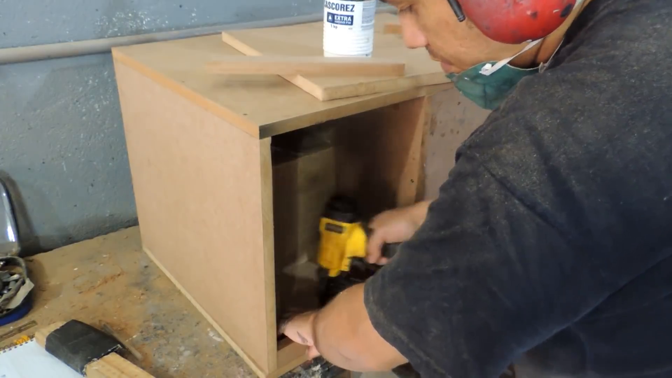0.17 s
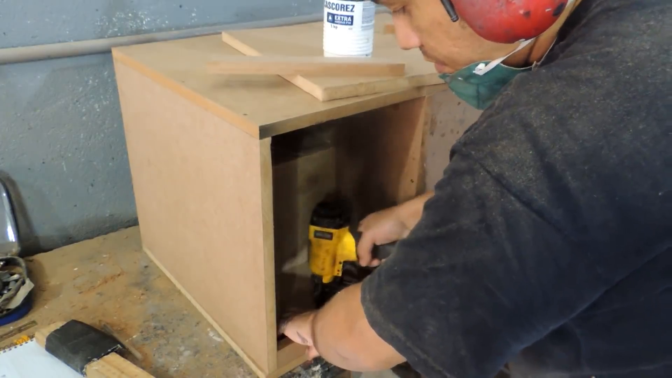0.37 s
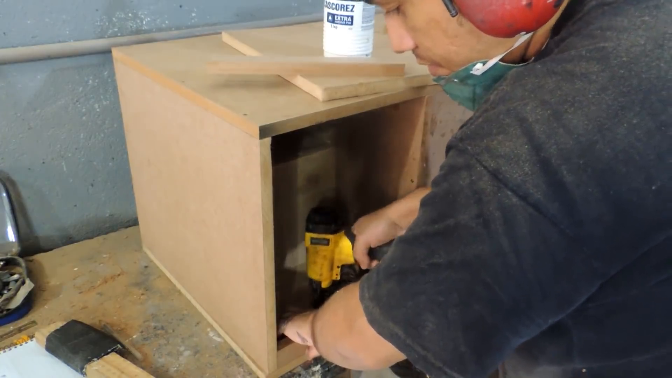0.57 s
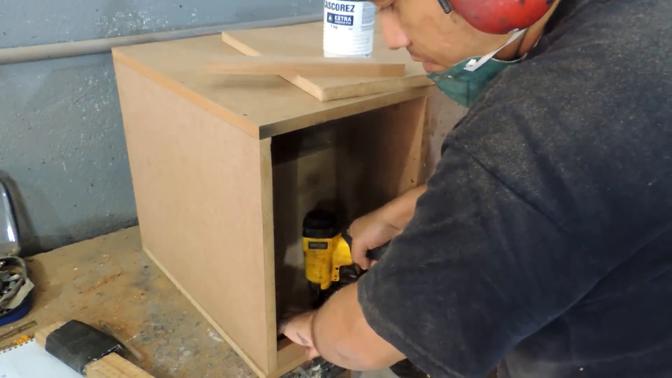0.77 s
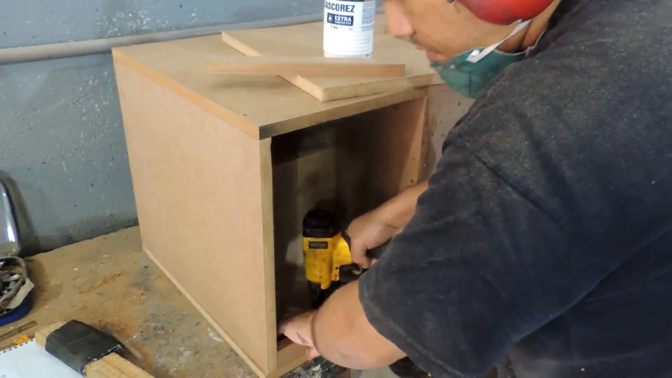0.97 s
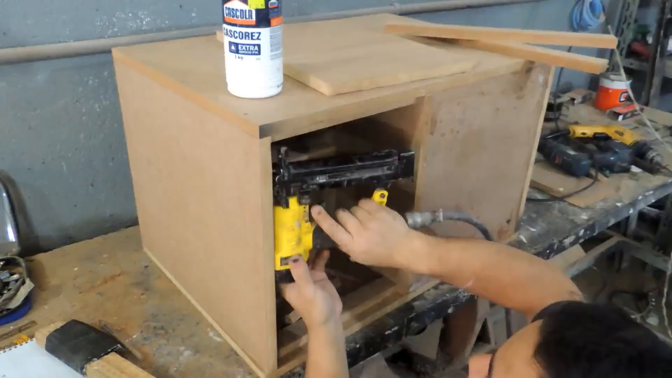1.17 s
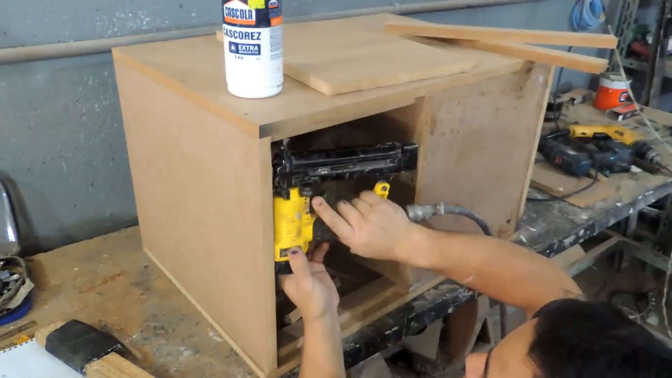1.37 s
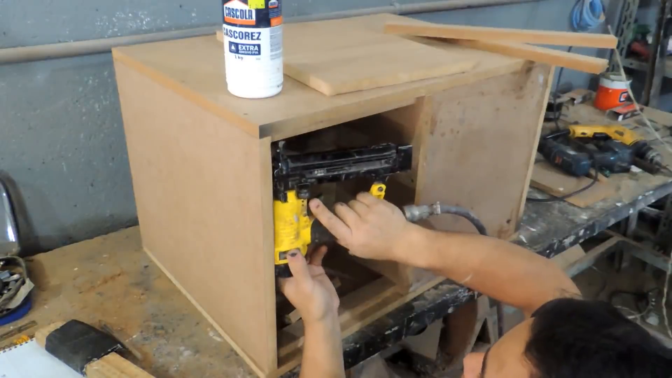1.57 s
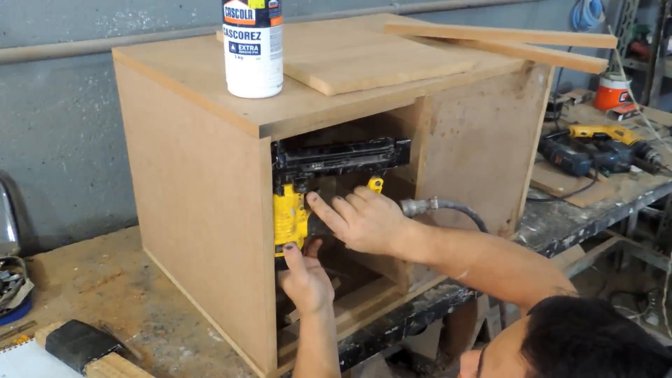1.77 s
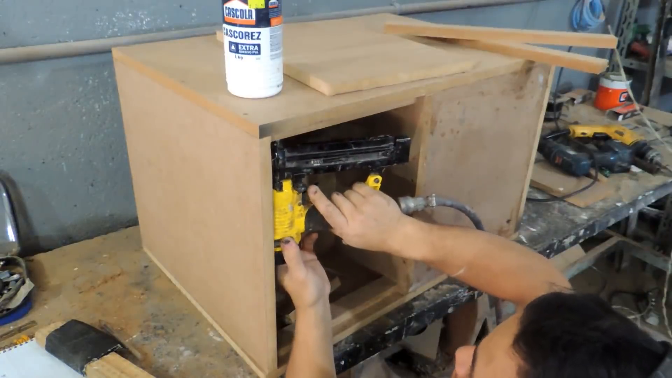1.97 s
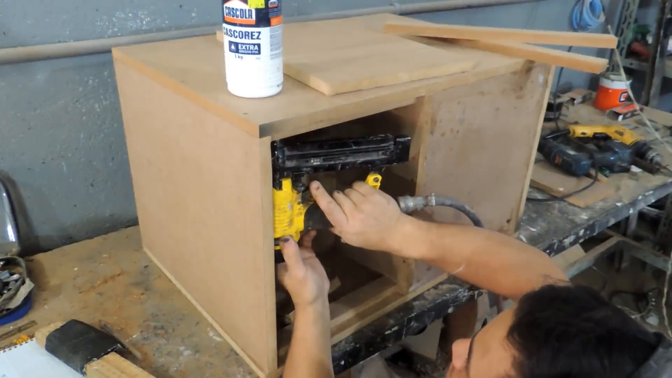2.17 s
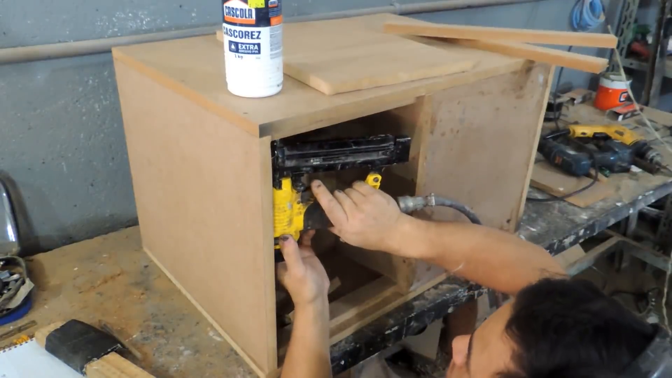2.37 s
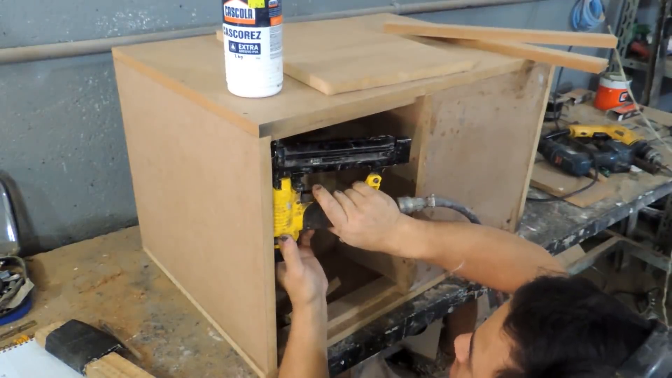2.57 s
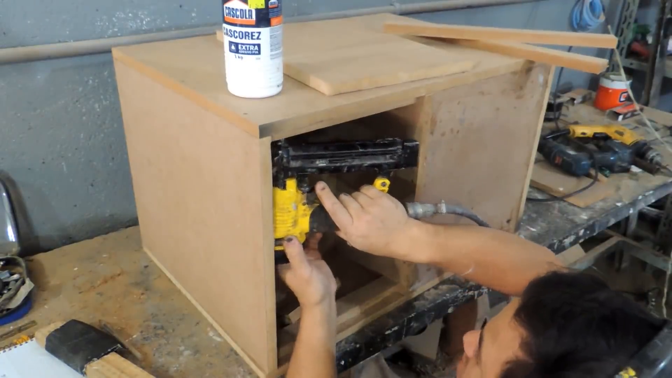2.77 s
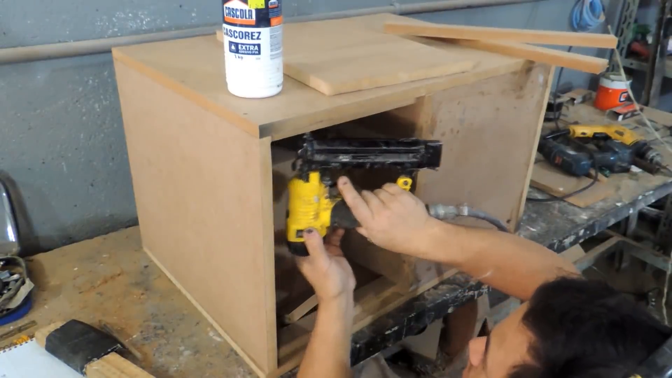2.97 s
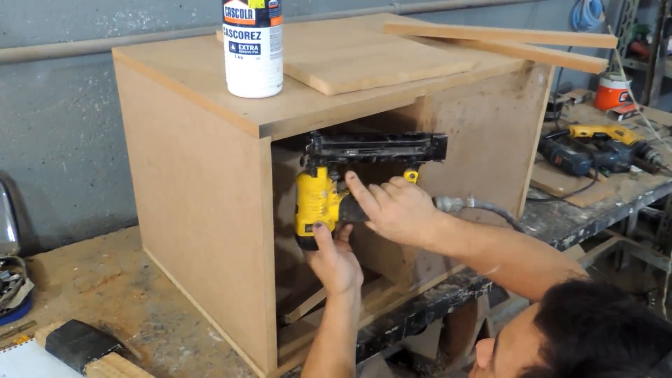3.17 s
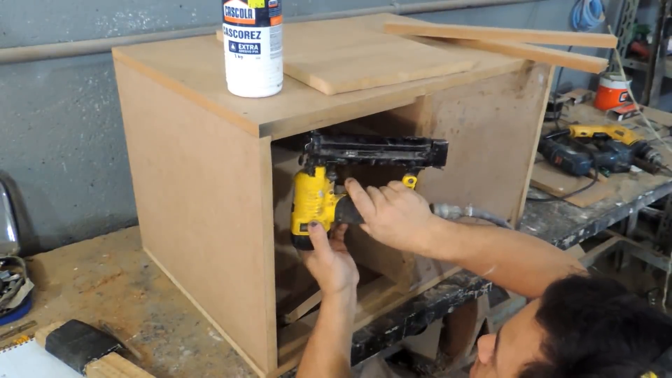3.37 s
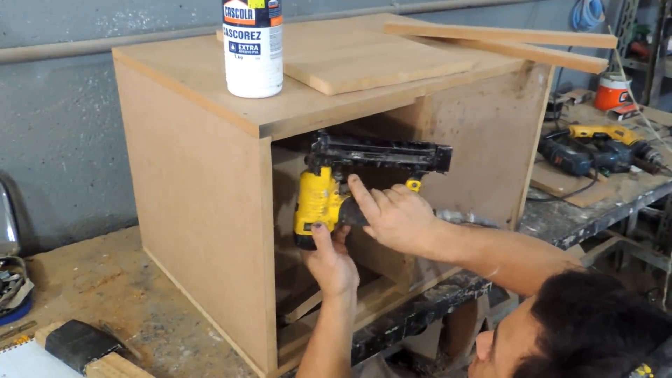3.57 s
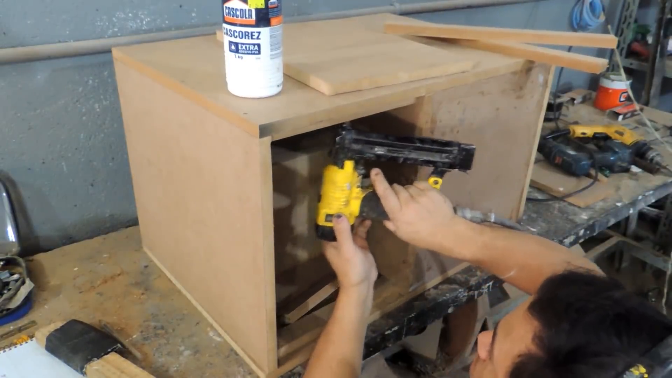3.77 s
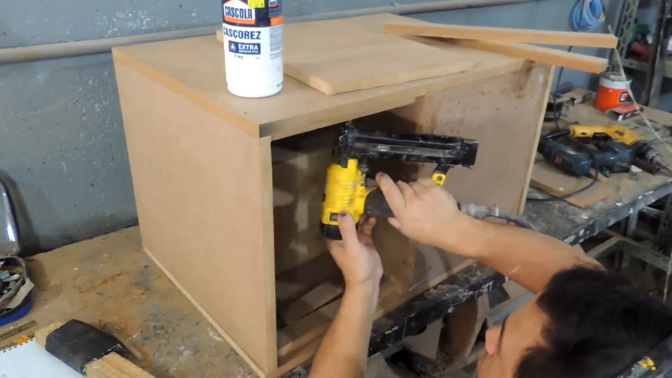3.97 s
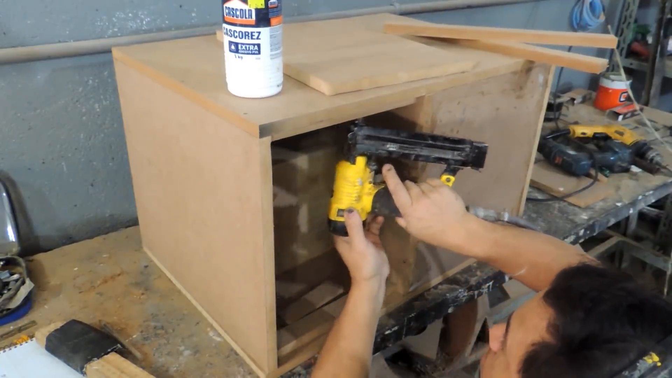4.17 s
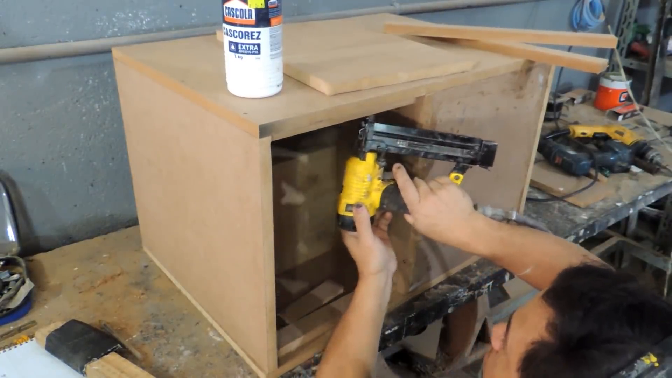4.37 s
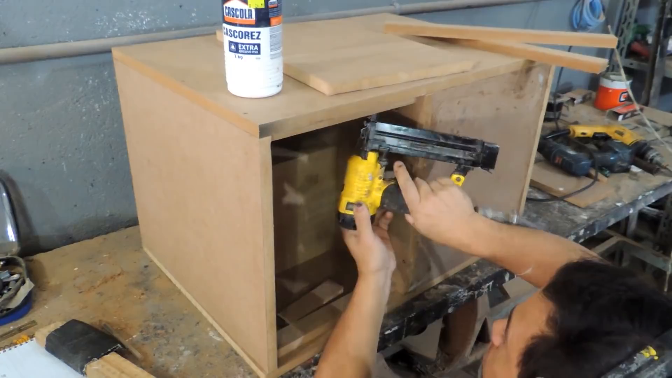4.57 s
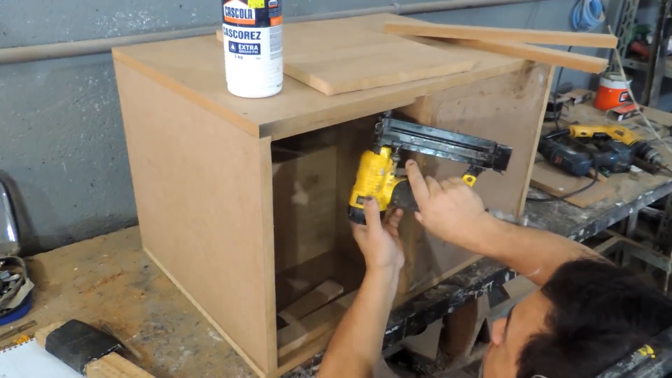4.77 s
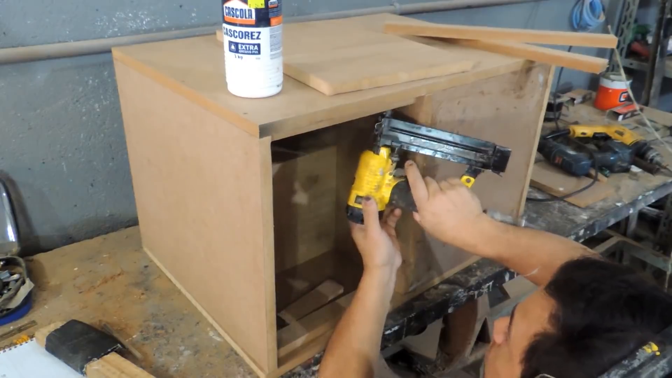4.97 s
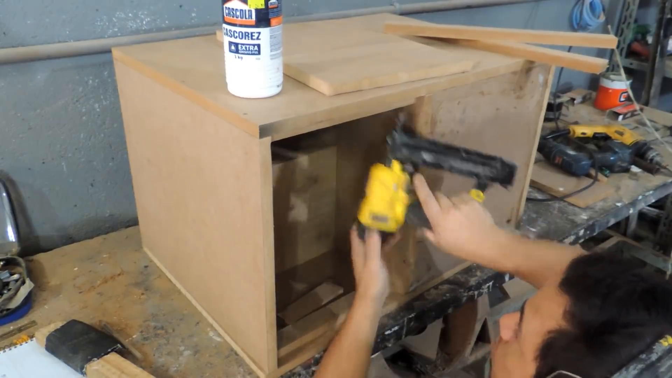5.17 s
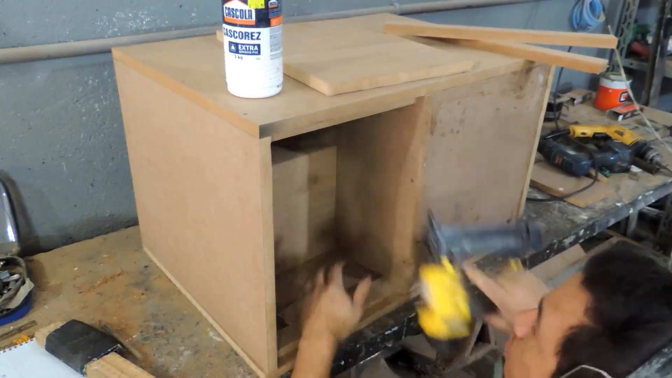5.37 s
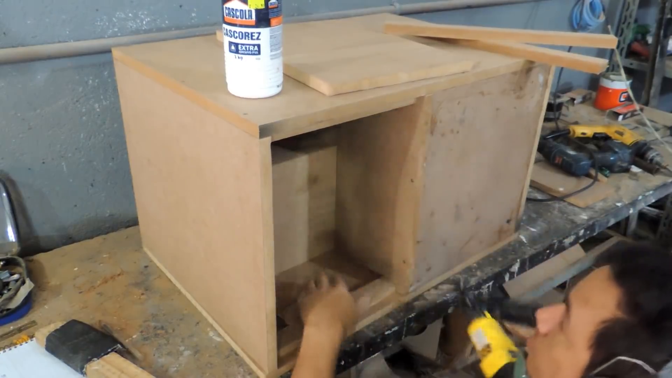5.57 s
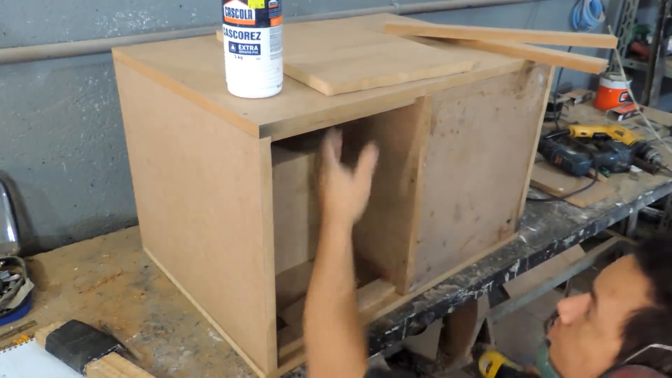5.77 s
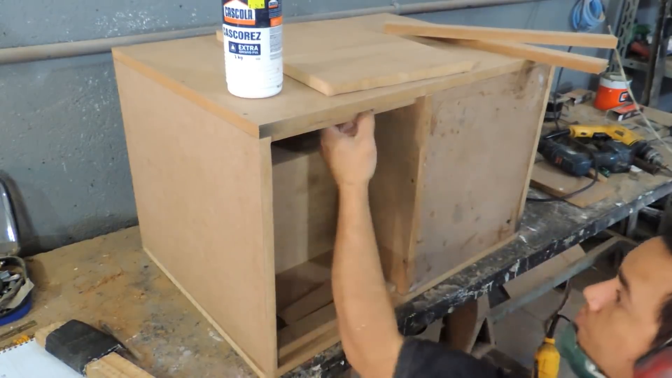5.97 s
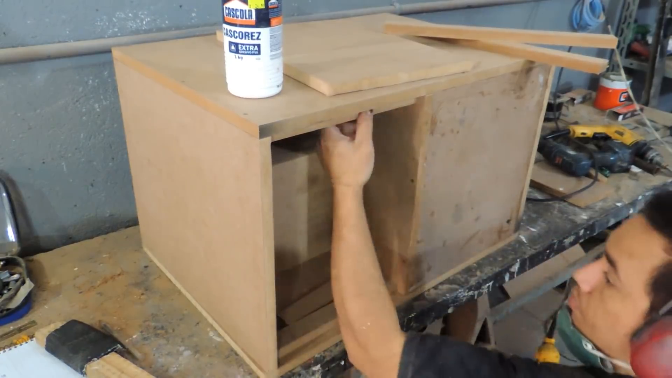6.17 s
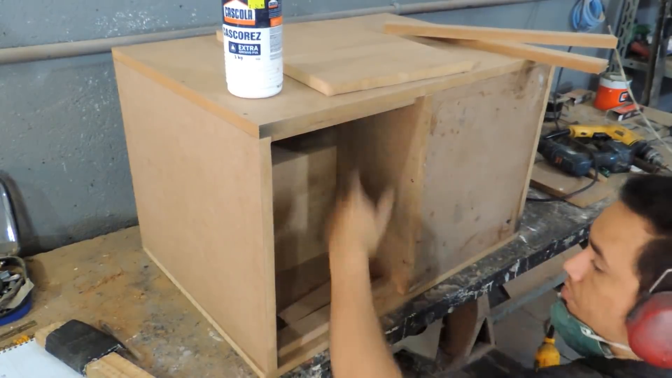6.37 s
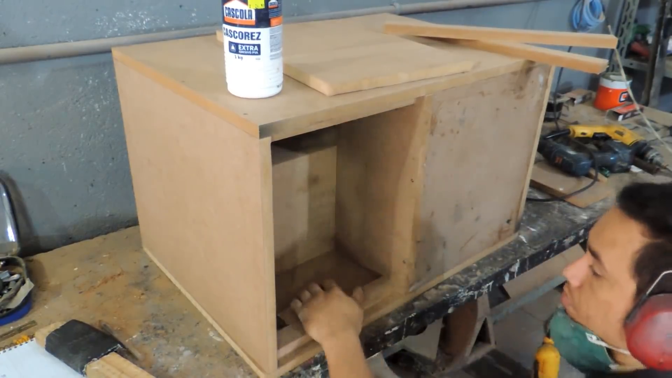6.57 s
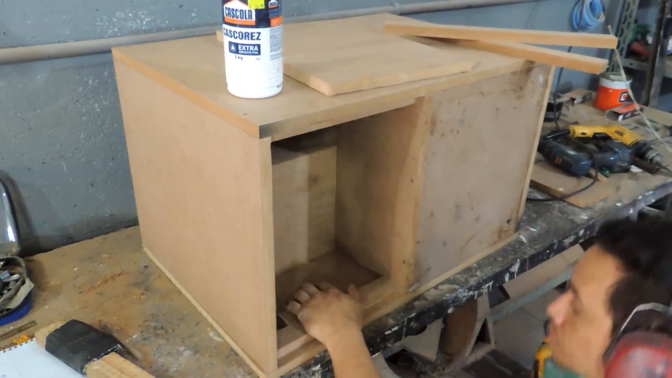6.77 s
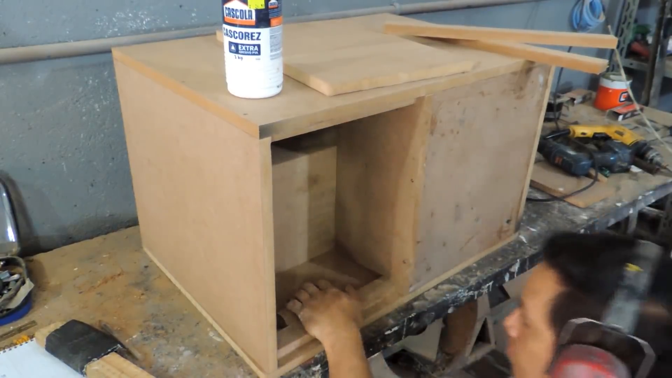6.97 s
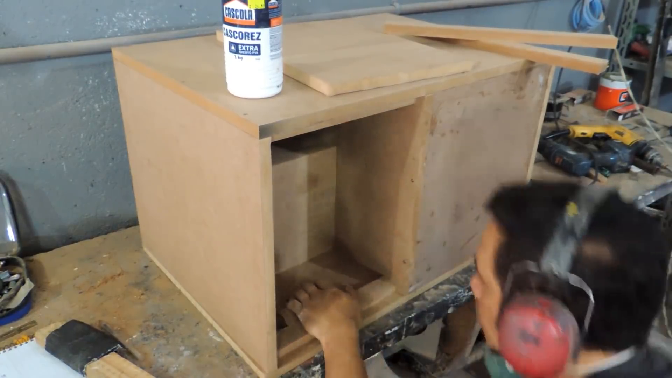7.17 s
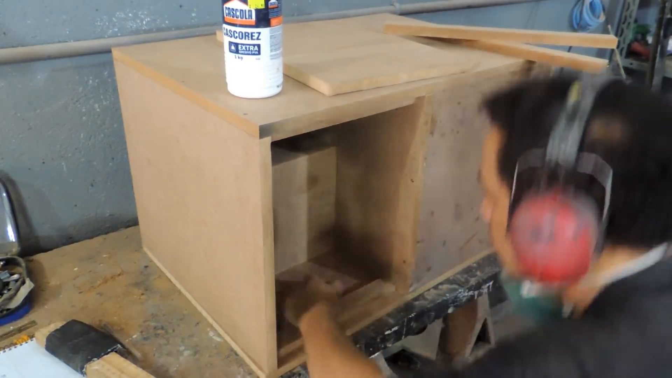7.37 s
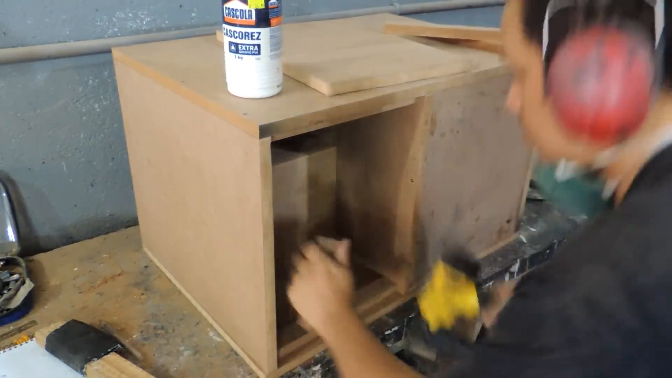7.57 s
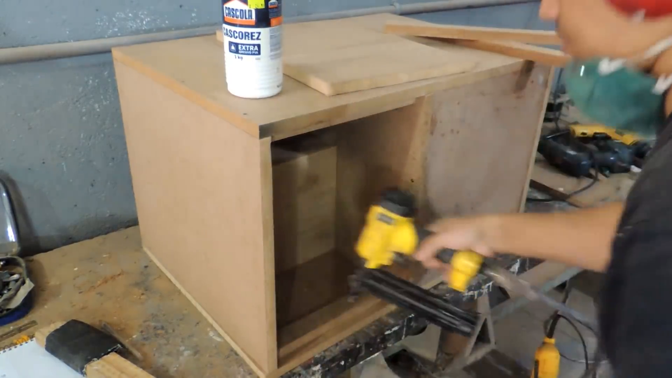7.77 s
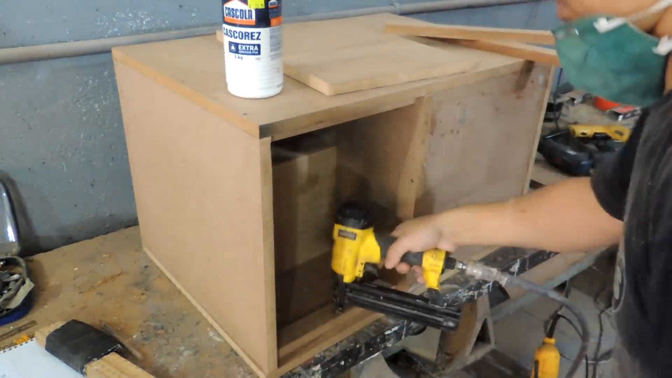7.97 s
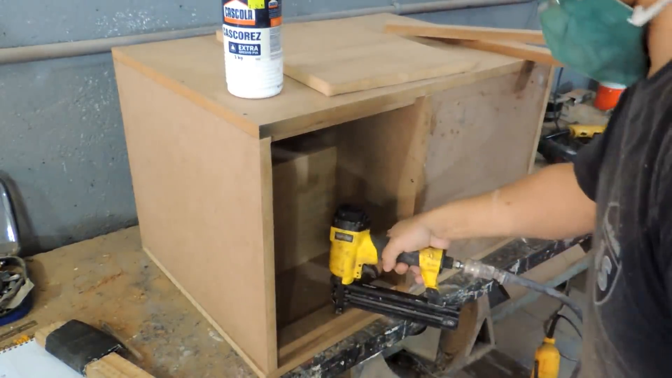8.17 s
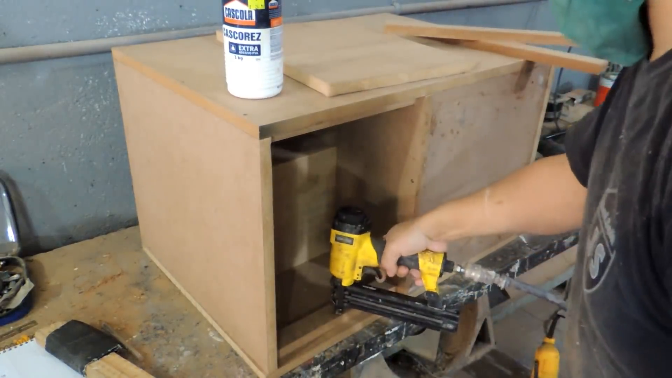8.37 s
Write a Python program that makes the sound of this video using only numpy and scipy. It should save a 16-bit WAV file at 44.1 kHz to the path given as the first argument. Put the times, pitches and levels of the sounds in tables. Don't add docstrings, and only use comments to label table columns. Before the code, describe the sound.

In a hard, reverberant workshop, a slide over wood and a sinking low fan hum lead to a nailer shot cut off abruptly. Knocks follow, then five spaced shots, each an air hiss, hard crack, hollow box boom and exhaust puff, growing duller and quieter. After a pause with soft knocks and clatter, the tool lands with a metallic ring and fires once more. Close stereo microphone with automatic gain.

```python
import sys
import numpy as np
from scipy import signal
from scipy.fft import rfft, irfft, next_fast_len
from scipy.io import wavfile
from scipy.ndimage import uniform_filter1d

SR = 44100
rng = np.random.default_rng(int(sys.argv[2]) if len(sys.argv) > 2 else 0)


def transcribe(u):
    v = np.clip(np.atleast_2d(u).T, -1, 1)
    q = np.round(v * 32767).astype(np.int16)
    wavfile.write(sys.argv[1], SR, q)


def voltage_ratio(decibels):
    exponent = np.asarray(decibels, float) / 20
    return 10 ** exponent


N = 370542

# (time [s], thin hiss [dB], full flow [dB], creep before flood [ms])
VALVE_OPENINGS = [
    (.917, -13, -9.5, 10),
    (2.427, -9, -7.5, 9.6),
    (3.284, -24, -11.5, 9),
    (3.840, -28, -17.5, 10),
    (4.349, -40, -21, 10),
    (4.8, -34, -30, 8),
    (8.342, -10.5, -12.5, 9),
]
# (time [s], crack [dB], box ring [dB], room send [dB], ring above 1 kHz [dB])
DRIVER_BLOWS = [
    (0.9443, -5.5, -14.5, -1.5, 1.5),
    (2.4543, -1.5, -13, 0, -0.5),
    (3.3114, -6, -17, -4.5, -5),
    (3.8680, -11, -20.5, -2.5, -4),
    (4.3742, -14, -25, -4, -3),
    (4.8240, -17.5, -32.5, -5, 1),
    (8.3850, -7.5, -11, -0.5, -2),
]
# (frequency [Hz], density [dB])
THIN_AIR = [(300, -45.5), (3000, -23), (5000, -6.5), (9000, -2.5), (13000, 0.5), (14600, -4.5)]
# (frequency [Hz], density [dB])
FLOOD_AIR = [(90, -39.5), (200, -12.5), (1500, -9.5), (3000, -4.5), (5000, -9.5), (9000, -5.5), (13000, -5),
             (14600, -3)]
# (frequency [Hz], density [dB])
CRACK_TONE = [(90, -38), (250, -9), (900, -8), (1500, 2), (2300, -9), (4000, -5), (8000, -9.5),
              (14600, -10)]
# (frequency [Hz], level [dB], T60 [s])
BOX_MODES = [(179.7, -6, 0.33), (300, -5, 0.24), (410, -8, 0.23), (482, -11, .2), (600, -7, 0.32),
             (712, -9, 0.092), (860, -8.5, 0.21), (1044, -11.5, 0.089), (1302, 0, 0.23), (1415, -4, 0.25),
             (1527, 0, 0.096), (1672, -7, 0.11), (2156, -13, .1), (2825, -13, .1), (3450, -9, .1),
             (4500, -14.5, .08)]


def fire(opening, blow):
    opens_s, thin_db, full_db, creep_ms = opening
    blow_s, crack_db, box_db, room_db, upper_db = blow
    t = opens_s - blow_s + np.arange(SR // 3) / SR
    size = len(t)

    floods_s = t[0] + creep_ms / 1000
    rise_s = 0.6 * creep_ms / 1000
    thin = voltage_ratio(thin_db) * noise(size, THIN_AIR, NEAR) * burst(t, t[0], 0.009, -t[0], 0.044)
    flood = burst(t, floods_s, rise_s, 0.008 - floods_s - rise_s, 0.05)
    full = voltage_ratio(full_db) * noise(size, FLOOD_AIR, NEAR) * flood

    strike = 1.4 * burst(t, 0, 0.00046, 0.00087, 0.0066)
    rebound = 1.3 * burst(t, 0.003, 0.00051, 0.00067, 0.0066)
    tail = 0.5 * burst(t, 0, 0.0017, 0.007, 0.04)
    crack = voltage_ratio(crack_db) * noise(size, CRACK_TONE, NEAR) * (strike + rebound + tail)

    modes = [(hz, db + upper_db * (hz > 1000), t60_s * 1.08) for hz, db, t60_s in BOX_MODES]
    boom = voltage_ratio(box_db + 10.5) * ring(modes, t, 0.06)
    cavity_hz, flutter_hz = 322, 57
    beat = np.sin(2 * np.pi * cavity_hz * t) * np.sin(np.pi * flutter_hz * t)
    beat = voltage_ratio(box_db + 4) * beat * burst(t, 0, 0.002, 0, 0.24)
    return opens_s, sent(thin + full + crack + (boom + beat), room_db)


# (burst time [s], burst level [dB], burst length [ms], room send [dB])
VENTS = [
    (2.584, -10.5, 28, 1),
    (3.424, -8.5, 24, -1),
    (4.006, -8.5, 23, -4.5),
    (4.497, -13, 24, -4.5),
    (4.946, -16, 18, -4.5),
]
# (frequency [Hz], density [dB])
JET_TONE = [(90, -40), (150, -9.5), (650, -14.5), (2300, -11.5), (3700, -7), (7100, -3.5), (10000, -2),
            (12700, -2), (14600, -3.5)]
# (frequency [Hz], density [dB])
PISTON_TONE = [(300, -28), (900, -7.5), (1400, 2.5), (2500, -8.5), (4500, -18.5), (9000, -25.5)]


def vent(s, burst_db, length_ms, room_db):
    t = np.arange(-0.022, 0.3, 1 / SR)
    size = len(t)
    seep_db, top_stop_db = -11.5, -6
    seep = 0.6 * burst(t, -0.022, 0.002, 0.02, 0.03) + 0.39 * burst(t, -0.013, 0.036, 0, 0.026)
    seep = voltage_ratio(burst_db + seep_db) * seep
    jet = 1.47 * burst(t, -0.0026, 0.0056, length_ms / 1000, 0.015) * voltage_ratio(-330 * t)
    jet = voltage_ratio(burst_db) * (jet + 0.22 * burst(t, 0, 0.0057, 0.027, 0.25))
    stop = burst(t, 0.021, 0.0004, 0.0012, 0.026)
    stop = voltage_ratio(burst_db + top_stop_db) * noise(size, PISTON_TONE, NEAR) * stop
    air = noise(size, THIN_AIR, NEAR) * seep + noise(size, JET_TONE, NEAR) * jet
    return s + t[0], sent(air + stop, room_db)


# (frequency [Hz], density [dB])
TICK_TONE = [(200, -20), (1500, -4.5), (4000, -6), (9000, -5), (14500, -7.5)]


def knock(modes, spread, s, db, tick_db, room_db):
    t = np.arange(0, 0.4, 1 / SR)
    tick = voltage_ratio(tick_db) * noise(len(t), TICK_TONE, NEAR) * burst(t, 0, 0.002, 0.0032, 0.048)
    return s, sent(voltage_ratio(db + 5) * ring(modes, t, spread) + tick, room_db)


# (time [s], ring [dB], tick [dB], room send [dB])
SHELF_CONTACT = (7.926, -15.5, -15, -2.5)
# (frequency [Hz], level [dB], T60 [s])
TOOL_MODES = [(240, -12, .2), (301, -4, .25), (360, -6, 0.17), (400, -2.5, .4), (601, -2, 0.15),
              (700, -4.5, .3), (831, -16, .25), (973, -5, .45), (1296, -4, 0.18), (2105, -28, .15),
              (2864, -23, 0.12)]


def set_down():
    return knock(TOOL_MODES, 0.019, *SHELF_CONTACT)


# (time [s], level [dB], pitch [Hz], tick [dB])
PANEL_KNOCKS = [(.349, -31, 257, -28.5), (.620, -37.5, 300, -39), (1.035, -16, 323, -41),
                (1.051, -19, 302, -42), (1.321, -34.5, 275, -39), (1.676, -35.5, 860, -34),
                (1.776, -31.5, 368, -55), (1.965, -35, 1950, -37), (1.982, -25.5, 375, -51),
                (2.348, -47, 400, -38.5), (5.412, -51.5, 323, -64), (6.653, -30, 503, -32.5),
                (7.271, -31, 627, -41), (7.367, -29, 793, -39), (8.076, -40, 620, -41),
                (8.262, -59, 510, -49)]
# (pitch ratio [1], level [dB])
PANEL_PARTIALS = [(1, 1), (1.33, -8), (1.95, -11), (2.8, -14)]


def panel_knock(s, db, pitch_hz, tick_db):
    modes = [(pitch_hz * ratio, level, 0.08 / ratio ** 0.5) for ratio, level in PANEL_PARTIALS]
    return knock(modes, 0.13, s, db, tick_db, room_db=-3.5)


# (start [s], level [dB], rise [s], hold [s])
SLIDE_STROKES = [
    (0, -30.5, 0.064, 0.011),
    (.075, -20.5, 0.04, 0.036),
    (.342, -32.5, 0.0031, .002),
]
# (frequency [Hz], density [dB])
SLIDE_COLOUR = [(80, -29), (150, -7.5), (310, -1), (750, -1.5), (1040, 0), (2000, -3), (4000, -9.5),
                (9000, -19), (14300, -23)]


def slide():
    return drag(SLIDE_STROKES, 0.83, SLIDE_COLOUR, slips_per_s=1500, spread_db=2.4)


# (start [s], level [dB], rise [s], hold [s])
CLATTER_STROKES = [
    (6.567, -29, 0.0042, 0.062),
    (6.647, -27, 0.0065, 0.036),
    (6.874, -31, 0.006, 0.031),
]
# (frequency [Hz], density [dB])
CLATTER_COLOUR = [(120, -46), (250, -6.5), (650, -7), (850, 1.5), (1250, -6), (1650, -4), (2200, -8),
                  (6000, -12), (14300, -18.5)]


def clatter():
    return drag(CLATTER_STROKES, 0.73, CLATTER_COLOUR, slips_per_s=1200, spread_db=2.1)


def drag(strokes, t60_s, tone, slips_per_s, spread_db):
    t = strokes[0][0] + np.arange(SR * 5 // 8) / SR
    hits = rng.random(len(t)) < slips_per_s / SR
    slips = hits * voltage_ratio(spread_db * np.minimum(rng.exponential(1, len(t)), 4))
    slips = signal.lfilter([1], [1, -0.985], slips)
    power = sum((voltage_ratio(db) * burst(t, s, rise_s, hold_s, t60_s)) ** 2 for s, db, rise_s, hold_s in strokes)
    texture = noise(len(t), tone, SAME) * (1.1 + 0.45 * evened(slips))
    return t[0], evened(texture) * np.sqrt(power)


# (time [s], level [dB])
CASING_THROBS = [(.13, -45), (.30, -33), (.55, -34.5), (.74, -32.5), (.81, -30), (.93, -38.5)]


def fan():
    t = np.arange(0, 0.95, 1 / SR)
    top_hz, end_hz, coasts_s, sag_hz_per_s = 77.4, 46, 0.12, 46
    hz = np.clip(top_hz - sag_hz_per_s * (t - coasts_s), end_hz, top_hz)
    tone = np.sqrt(2) * np.sin(2 * np.pi * np.cumsum(hz) / SR)
    tone = tone * swells(CASING_THROBS, 0.026, voltage_ratio(-41.5), t)
    return np.tile(tone * signal.windows.tukey(len(t), 0.1), (2, 1))


# (time [s], level [dB])
SLOW_GAIN = [
    (2.44, 0),
    (2.6, -18),
    (3.0, -20),
    (3.4, -14.5),
    (4.3, -19),
    (5.0, -30),
    (5.45, -29.5),
    (6.9, 0.5),
]
# (frequency [Hz], density [dB])
HISS_TONE = [(82, -35.5), (140, -5), (177, -2.5), (236, -9), (335, -7.5), (465, -9.5), (522, -8.5),
             (769, -11), (933, -10.5), (3280, -18), (12700, -23), (14300, -30)]
# (frequency [Hz], density [dB])
RUMBLE_TONE = [(8.8, -37), (15, -4.5), (49, 2), (63, -1.5), (81, -8.5), (110, -8.5), (140, -37),
               (240, -120)]
# (time [s], level [dB])
CAMERA_THUDS = [(1.07, -36), (1.78, -39), (2.6, -34.5), (3.44, -38.5), (4.0, -37), (4.52, -50), (4.96, -47),
                (5.58, -50), (5.93, -46), (6.08, -45.5), (6.24, -42), (6.62, -40.5), (6.8, -40),
                (7.03, -44), (7.24, -42), (7.63, -53), (8.4, -32)]
# (time [s], level [dB])
HUM_LEVEL = [(1.0, -73.5), (1.2, -57), (1.8, -53), (2.4, -46.5), (2.5, -69)]


def background():
    t = np.arange(N) / SR
    gain = curve(SLOW_GAIN, t)
    lumps = evened(uniform_filter1d(rng.standard_normal(N), 2500))
    steady = np.where(t < SCENE_CHANGE[0][0], voltage_ratio(-43), voltage_ratio(-42.5) * gain ** 0.5)
    rumble = evened(noise(N, RUMBLE_TONE, NEAR) * voltage_ratio(1.5 * lumps))
    rumble = rumble * swells(CAMERA_THUDS, 0.022, steady, t)
    hum_hz = 175 + 4 * lumps
    hum = np.sin(2 * np.pi * np.cumsum(hum_hz) / SR) * curve(HUM_LEVEL, t)
    hiss = voltage_ratio(-41) * noise(N, HISS_TONE, SAME) * gain * voltage_ratio(0.46 * lumps[::-1])
    return hum + hiss + rumble


# (frequency [Hz], T60 [s])
ROOM_T60 = [(100, 0.68), (260, .6), (700, 0.56), (1840, 0.62), (4850, 0.57), (12800, .46)]
# (frequency [Hz], level [dB])
WALL_COLOUR = [(150, -4), (320, -1), (600, -7), (1000, 1), (1500, -2), (2500, 1.5), (6000, 1), (13000, -2)]


def diffuse(send):
    frame = dict(nperseg=512, noverlap=384)
    hz, t, z = signal.stft(send, SR, **frame)
    energy = uniform_filter1d(abs(z) ** 2, size=3, axis=0)
    u = t[t < 1]
    build_up = np.clip((u - 0.005) / 0.009, 0, 1)
    leak = voltage_ratio(-120 * u / read(ROOM_T60, hz)[:, None]) * build_up
    leak = leak / leak.sum(axis=1)[:, None]
    stored = signal.fftconvolve(energy, leak, axes=1)[:, :len(t)]
    white = noise(len(send), [(1, 0), (2, 0)], SAME)
    field = signal.stft(white, SR, **frame)[2]
    field = field / np.sqrt(np.mean(abs(field) ** 2))
    field = field * np.sqrt(abs(stored)) * voltage_ratio(read(WALL_COLOUR, hz))[:, None]
    return signal.istft(field, SR, **frame)[1][:, :len(send)]


def ring(modes, t, spread):
    hz, db, t60_s = np.transpose(np.repeat(modes, 4, axis=0))[:, :, None]
    hz = hz * (1 + spread * rng.uniform(-1, 1, hz.shape))
    phase = 2 * np.pi * (hz * t + rng.random(hz.shape))
    build_up = np.clip(hz * t / 1.5, 0, 1)
    partners = voltage_ratio(db - 60 * t / t60_s) * np.sin(phase) * build_up
    out = partners.sum(0) * burst(t, 0, 0.003, 0, 11)
    return np.tile(out / abs(out).max(), (2, 1))


def burst(t, start_s, rise_s, hold_s, t60_s):
    u = t - start_s
    return np.clip(u / rise_s, 0, 1) ** 2 * voltage_ratio(-60 * np.maximum(u - rise_s - hold_s, 0) / t60_s)


# (frequency [Hz], likeness [0-1])
NEAR = [(60, .96), (380, 0.96), (940, 1), (2400, .6), (6000, .45), (14000, .5)]
# (frequency [Hz], likeness [0-1])
SAME = [(60, 0.92), (150, 0.97), (380, 0.92), (940, 0.79), (2360, 0.29), (5910, 0.14), (14800, 0.2)]


def noise(size, tone, likeness):
    wide = next_fast_len(size)
    ports = pair(*rng.standard_normal((2, wide)), likeness)
    shape = voltage_ratio(read(tone, np.fft.rfftfreq(wide, 1 / SR)))
    return evened(irfft(rfft(ports) * shape, wide)[:, :size])


# (frequency [Hz], left minus right [dB])
PORT_LEAN = [(60, -1.5), (240, -1), (940, -2), (3740, -2), (14800, -3.5)]


def pair(left, other, likeness):
    size = next_fast_len(len(left))
    hz = np.fft.rfftfreq(size, 1 / SR)
    same = np.clip(read(likeness, hz), 0, 1)
    lean = voltage_ratio(read(PORT_LEAN, hz) / 2)
    a, b = rfft(left, size), rfft(other, size)
    right = same * a + np.sqrt(1 - same ** 2) * b
    return irfft([a * lean, right / lean], size)[:, :len(left)]


def evened(x):
    return x / np.sqrt(np.mean(x ** 2) + 1e-20)


def read(points, hz):
    f, value = np.transpose(points)
    return np.interp(np.log(hz + 1), np.log(f + 1), value)


def curve(rows, t):
    s, db = np.transpose(rows)
    return voltage_ratio(np.interp(t, s, db))


def swells(rows, width_s, base, t):
    power = sum((voltage_ratio(db) * np.exp(-0.5 * ((t - s) / width_s) ** 2)) ** 2 for s, db in rows)
    return np.sqrt(base ** 2 + power)


def sent(x, room_db):
    return np.vstack([x, voltage_ratio(room_db) * x[:1]])


def add(mix, s, sound):
    part = mix[:, round(s * SR):][:, :sound.shape[1]]
    part += sound[:, :part.shape[1]]


# (time [s], level [dB])
SCENE_CHANGE = [
    (1.003, 4),
    (1.006, -14),
    (1.024, -11),
    (1.03, -64),
]


def scene():
    first, near = np.zeros((3, SR * 2)), np.zeros((3, N))
    add(first, *fire(VALVE_OPENINGS[0], DRIVER_BLOWS[0]))
    for opening, blow in zip(VALVE_OPENINGS[1:], DRIVER_BLOWS[1:]):
        add(near, *fire(opening, blow))
    for row in VENTS:
        add(near, *vent(*row))
    for row in PANEL_KNOCKS:
        add(near, *panel_knock(*row))
    add(near, *set_down())

    mix = near[:2] + diffuse(near[2]) + background()
    chop = curve(SCENE_CHANGE, np.arange(SR * 2) / SR)
    add(mix, 0, (first[:2] + diffuse(first[2])) * chop)
    add(mix, *slide())
    add(mix, *clatter())
    add(mix, 0, fan())
    return mix


def top_cut(x):
    return signal.sosfilt(signal.butter(12, 15410, fs=SR, output="sos"), x)


def record(dry):
    overload, edge_hz = 1.72, 14200
    band = signal.firwin(1023, edge_hz, window=("kaiser", 9), fs=SR)[None]
    limited = signal.oaconvolve(overload * np.tanh(dry / overload), band, "same")
    return top_cut(np.clip(limited, -1, 1))


dry = scene()
out = record(dry)
transcribe(out)
```